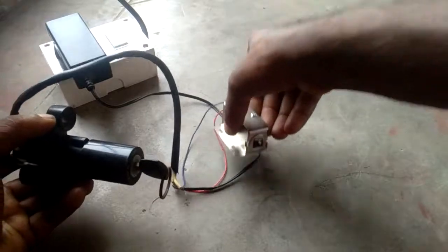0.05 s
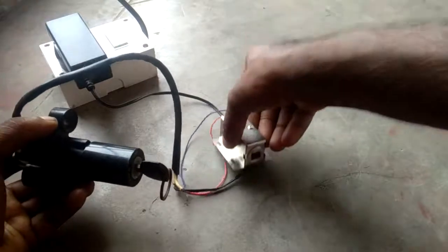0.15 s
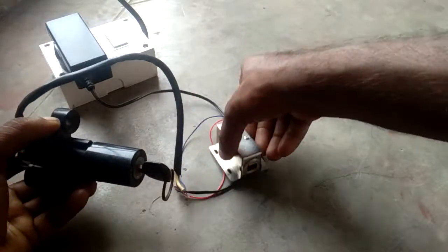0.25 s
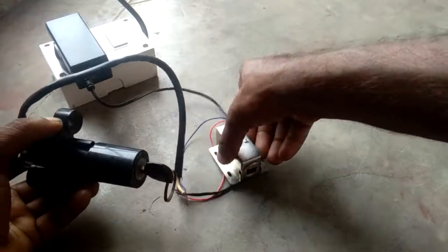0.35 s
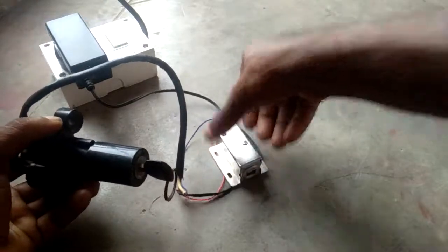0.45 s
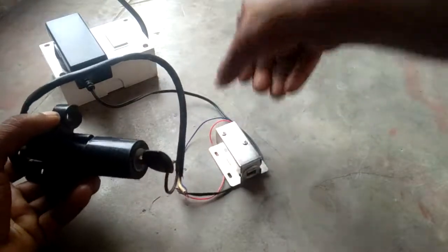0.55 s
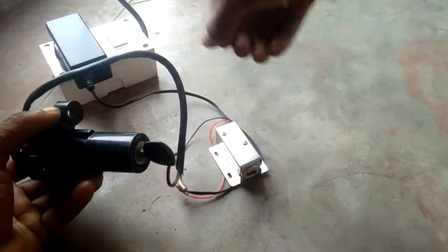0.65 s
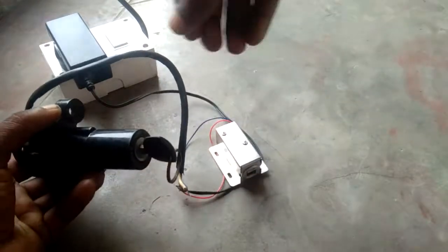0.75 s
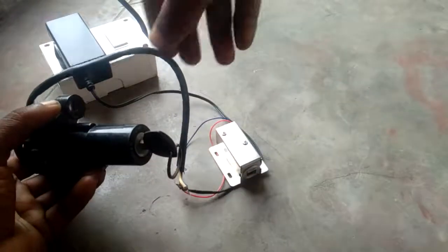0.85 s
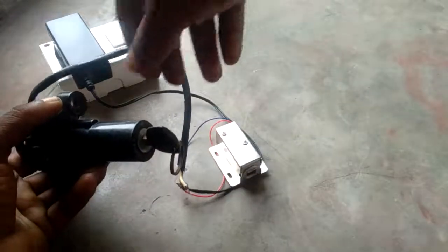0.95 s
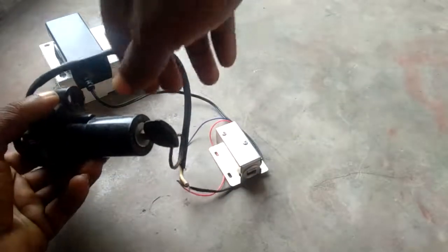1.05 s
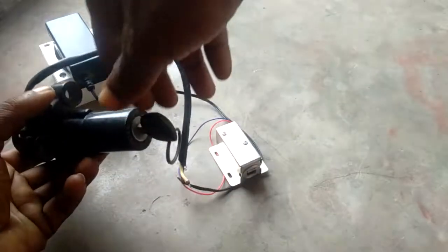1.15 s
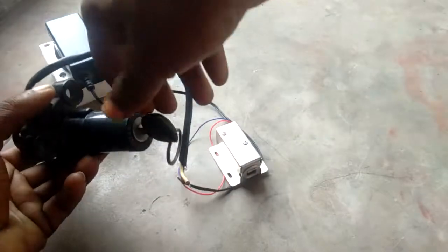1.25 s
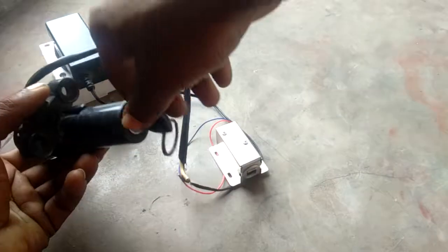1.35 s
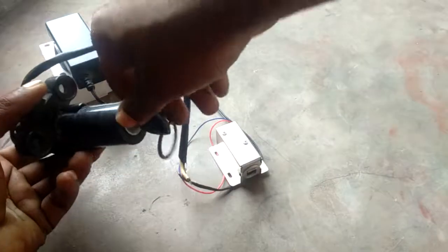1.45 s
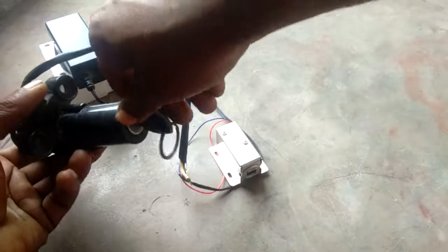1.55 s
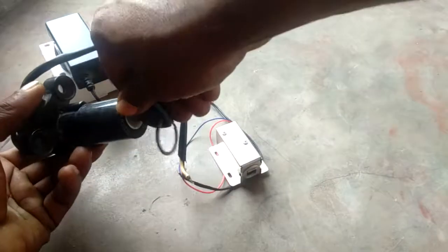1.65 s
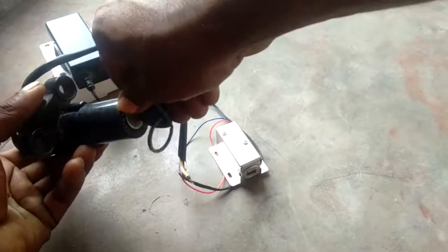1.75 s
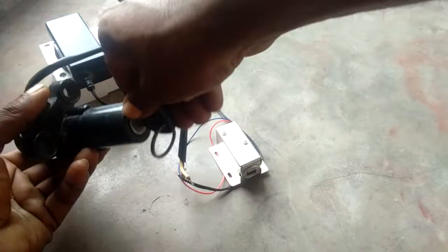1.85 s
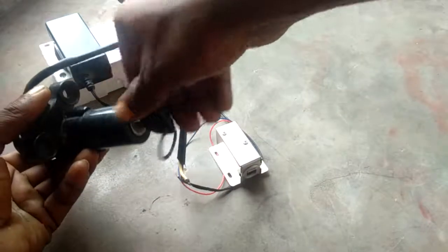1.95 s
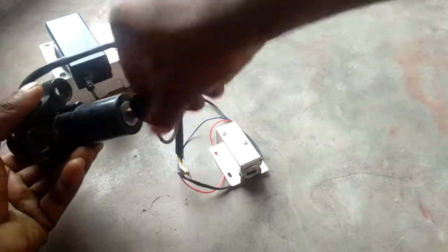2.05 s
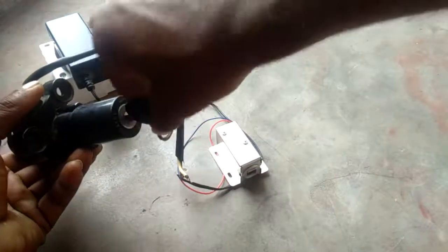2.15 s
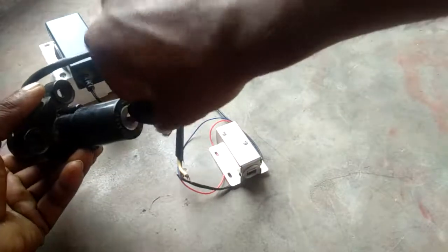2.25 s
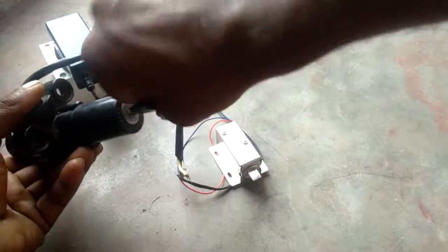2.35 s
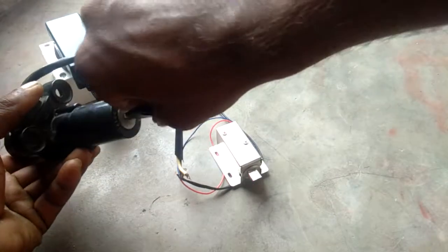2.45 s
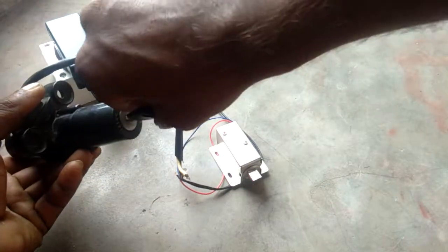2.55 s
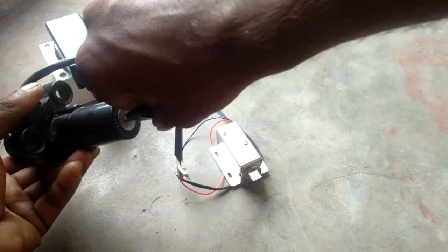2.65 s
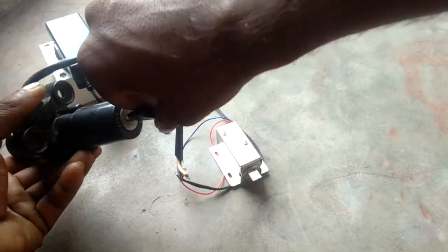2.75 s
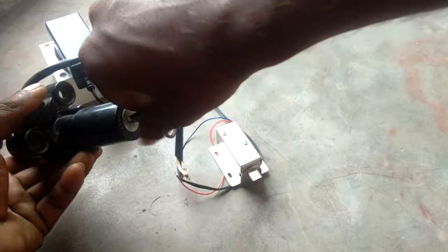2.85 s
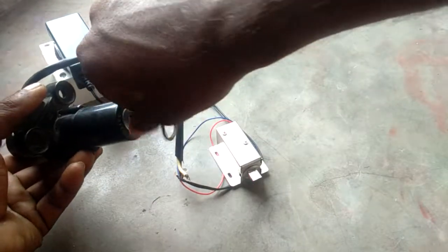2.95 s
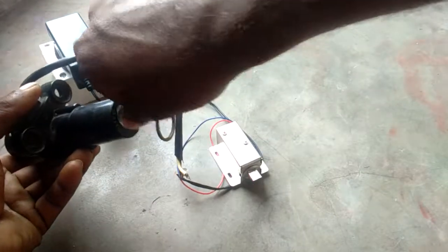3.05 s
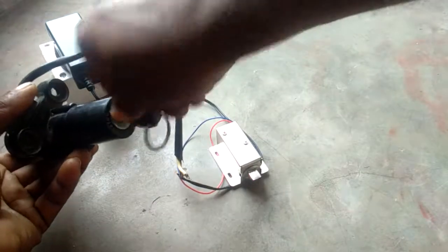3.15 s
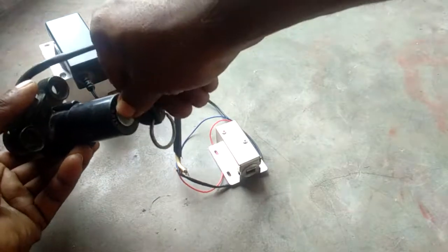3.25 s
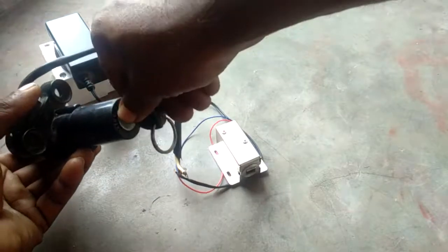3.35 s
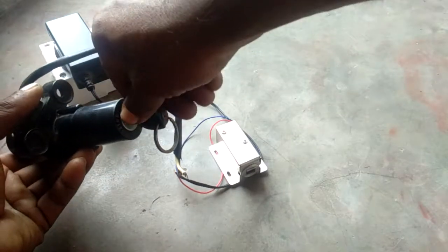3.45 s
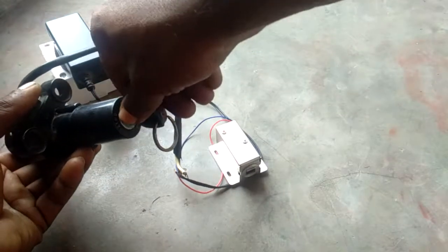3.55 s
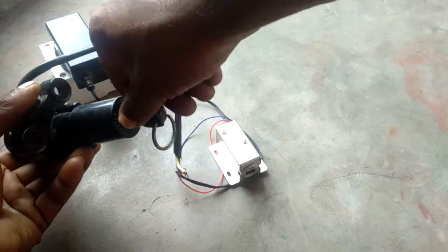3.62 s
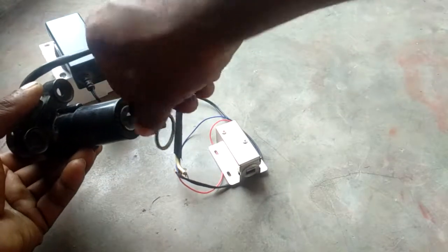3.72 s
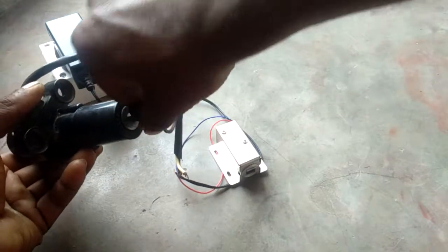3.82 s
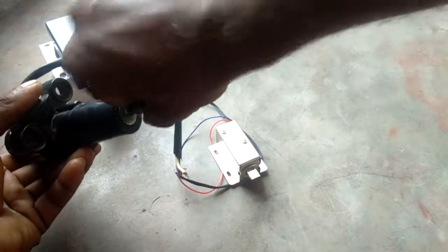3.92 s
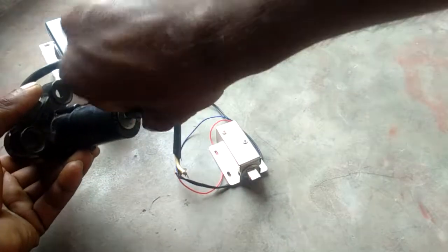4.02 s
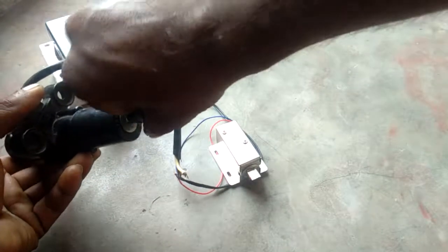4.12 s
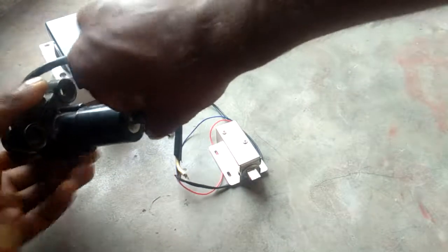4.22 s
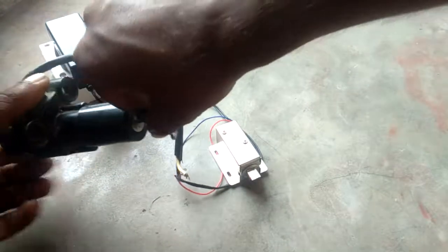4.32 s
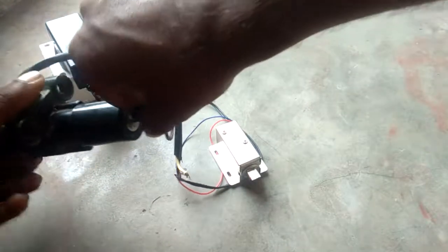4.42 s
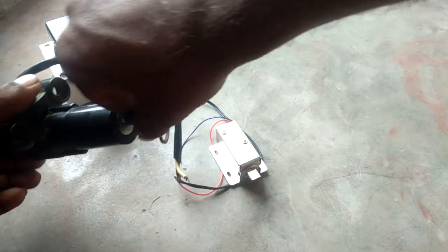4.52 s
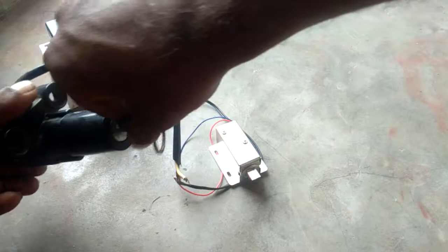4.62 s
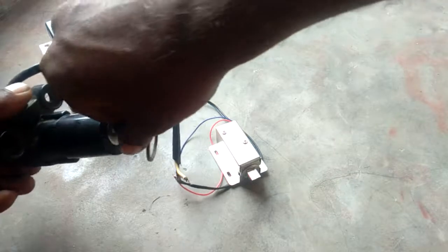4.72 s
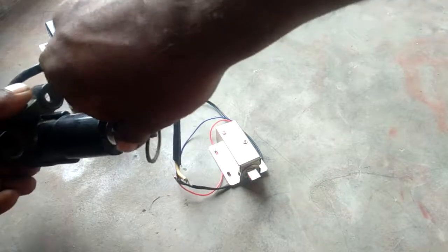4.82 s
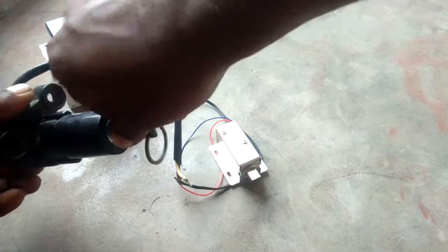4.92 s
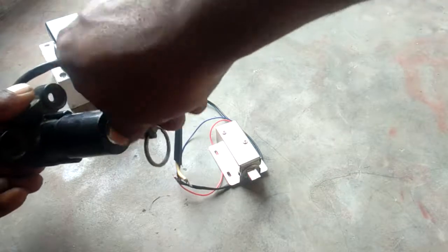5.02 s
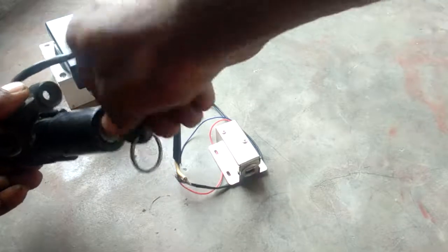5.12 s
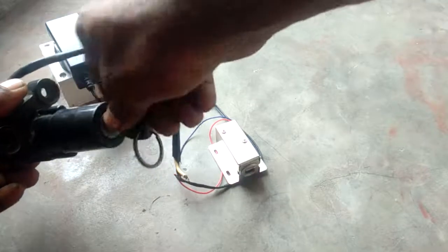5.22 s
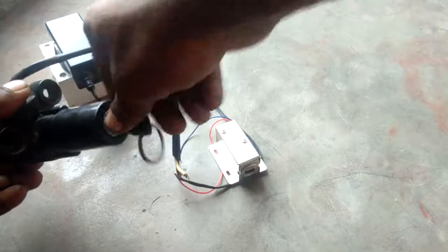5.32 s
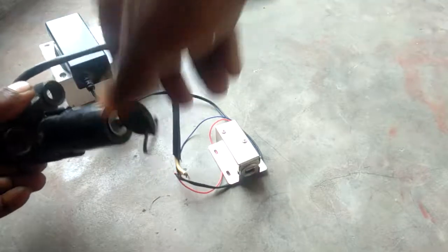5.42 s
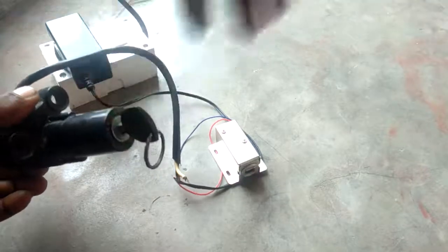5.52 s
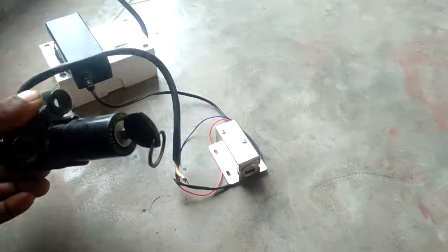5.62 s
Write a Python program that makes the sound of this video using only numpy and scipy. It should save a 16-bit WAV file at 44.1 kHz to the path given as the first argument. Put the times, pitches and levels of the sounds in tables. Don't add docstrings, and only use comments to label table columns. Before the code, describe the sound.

A small metal lock rattles onto concrete, then a key switch ticks and its bolt snaps out and in four times in a bare room.

```python
import sys
import numpy as np
from scipy import signal
from scipy.fft import rfft, irfft, next_fast_len
from scipy.io import wavfile
from scipy.ndimage import uniform_filter1d, map_coordinates

SR = 44100
rng = np.random.default_rng(int(sys.argv[2]) if len(sys.argv) > 2 else 0)


def materialize(psi):
    bounded = np.clip(np.atleast_2d(psi).T, -1, 1)
    quanta = np.round(bounded * 32767).astype(np.int16)
    wavfile.write(sys.argv[1], SR, quanta)


def attenuation_scalar(level_db):
    decades = np.asarray(level_db, float) / 20
    return 10 ** decades


N = 250488

# (time [s], strength [dB], rebound [dB], extra hardness [dB/octave], key tick [dB])
STROKE_EVENTS = [
    (2.4985, 0.1, -1, 0, 2.2),
    (3.3233, -0.84, -16, -0.8, -2),
    (4.0607, -0.5, 5, 2.7, 3),
    (5.2567, -0.8, 1, 0.5, 1.5),
]
# (delay [s], ring [dB], chatter [dB], chatter length [s], hardness [dB/octave])
SPRING_OUT_CONTACTS = [
    (0, -21.5, -14.5, 0.0019, 6.5),
    (.0022, -11, -30, 0.001, -2),
    (.0062, -46, -19, 0.019, 8.5),
    (.0168, -23.5, -20, 0.007, -2),
]
PULL_IN_CONTACTS = [
    (0, -20, 5.5, 0.0027, 4.5),
    (.003, -11.5, -1.5, 0.0065, 6),
    (.007, -50.5, -11, .005, 8.5),
    (0.015, -27.5, -14.5, 0.013, -4),
]
LOWER_HZ = [1700, 2290, 2420, 2785, 3340, 3415, 3505, 4310, 4460, 5150, 5580, 5890, 6440]
# (t60 [s], level springing out [dB],
# level pulled in [dB])
LOCK_MODES = [(0.02, -19, -42), (0.026, -35, -18.5), (0.0323, 1, -5.5), (0.021, -5, -15.5),
              (0.13, -10, -9.5), (.07, -8.5, -9), (0.09, -30, -10.5), (0.022, -7, -8), (0.032, -21, -6.5),
              (0.0055, -19, -20), (0.029, -15, -4.5), (.005, -6, -2.5), (0.0054, -23, -6.5),
              (0.019, -18, -11), (0.0071, -22, -9.5), (0.0065, -15, -17), (0.0051, -8, -11.5),
               (.022, -16, -17.5), (0.0056, -39, -27.5), (0.023, -21, -20.5), (0.022, -16, -17),
               (.012, -12.5, -19), (.012, -27, -19.5), (.01, -18.5, -23.5), (.018, -39, -26),
               (.018, -26, -28.5)]
UPPER_HZ = [6850, 7250, 7900, 8550, 8870, 9600, 10950, 11610, 12200, 12650, 13650, 14540, 15250]
# (lead [s], ring [dB], chatter [dB], chatter length [s], hardness [dB/octave])
KEY_OFF_CONTACTS = [(.021, -73, -36, 0.0033, 1.5), (.0175, -37, -17.5, .0045, -3),
                    (.0143, -48, -34.5, 0.0044, -2.5)]
KEY_ON_CONTACTS = [(.0275, -39.5, -23, 0.0046, -4), (0.027, -39, -19, 0.012, -2.5)]
# (frequency [Hz], t60 [s], level [dB])
BARREL_MODES = [(900, .004, -4), (1775, 0.011, -4.5), (2460, 0.025, -4.5), (3240, 0.0077, -8.5),
                (5270, 0.0043, 0.5), (5550, 0.0058, 2.5), (6690, 0.016, -1), (8040, 0.0044, -10),
                (9480, 0.0044, -15), (12300, .006, -7.5), (14700, .005, -12.5)]
# (time [s], ring [dB], hardness [dB/octave])
SETTLE_EVENTS = [(0.3042, -42, -4), (0.344, -47, -9), (.358, -43, -8), (.372, -33, 1.5),
                 (0.3818, -40.5, -2), (.388, -38.5, -2), (0.393, -45, -1.5), (.521, -58, -7),
                 (0.5754, -46, -4)]
# (frequency [Hz], t60 [s], level [dB])
FLANGE_MODES = [(1880, 0.0056, -7), (2750, 0.0087, -6.5), (3230, 0.0081, -3.5), (3370, 0.033, -10),
                (4770, 0.0079, -12.5), (5650, 0.0098, -12), (6300, 0.022, -11), (7500, 0.0033, -8),
                (8650, 0.008, -9), (10400, .02, -11), (11200, 0.021, -8), (11340, 0.017, -6.5),
                (11900, 0.015, -3), (12800, .015, -18), (13300, 0.02, -6), (15000, .01, -10)]
# (frequency [Hz], t60 [s])
ROOM_T60 = [(1000, 0.34), (2500, 0.49), (5000, 0.48), (8000, 0.49), (11000, 0.31), (16000, 0.31)]
# (frequency [Hz], density [dB/Hz])
AIR_SPECTRUM = [(140, -17.5), (230, -4.5), (274, 0), (333, -2), (465, -4), (554, -3), (722, -12.5),
                (816, -6.5), (1240, -7), (2000, -16), (2700, -19.5), (3910, -30), (6390, -33), (8770, -49),
                (15400, -60)]
# (time [s], level [dB])
AIR_LEVEL = [(0.0, -43), (0.76, -42), (1.01, -43.5), (3.23, -43.5), (3.67, -43.5), (5.68, -44)]
# (frequency [Hz], density [dB/Hz])
RUMBLE_SPECTRUM = [(12, -25.5), (38, -7), (48, -1.5), (70, 3), (150, 0.5), (230, -12), (300, -48)]
# (frequency [Hz], width [Hz], level [dB], steady share [0-1])
HUM_DRONES = [(70.6, 12, -58.5, 0.9), (101, 10.2, -42.5, 0.03), (115.6, 45, -54.5, 1),
              (202.7, 15, -47, 0.02), (613, 100, -53, 0.06)]
# (time [s], frequency [Hz], level [dB])
SQUEAL = [
    (1.17, 1850, -70),
    (1.27, 1860, -51),
    (1.44, 1815, -52),
    (1.52, 1800, -75),
]


def unit(x):
    return x / np.sqrt(np.mean(x ** 2) + 1e-20)


def along(points, hz):
    point_hz, value = np.transpose(points)
    return np.interp(np.log(hz + 1), np.log(point_hz + 1), value)


def curves(rows):
    knot_s, *columns = np.transpose(rows)
    return [np.interp(np.arange(N) / SR, knot_s, column) for column in columns]


def noise(gain):
    m = next_fast_len(N)
    spectrum = rfft(rng.standard_normal(m)) * gain(np.fft.rfftfreq(m, 1 / SR))
    return unit(irfft(spectrum, m)[:N])


def wobble(rate_hz):
    knots = rng.standard_normal(int(N * rate_hz / SR) + 4)
    return map_coordinates(knots, [np.arange(N) * rate_hz / SR])


def strikes(contacts, modes, scatter_db):
    out = np.zeros(N + SR)
    t = np.arange(SR // 5) / SR
    hz, t60_s, mode_db = np.transpose(modes)[:, :, None]
    octaves = np.log2(hz / 4000)
    wave = np.sin(2 * np.pi * hz * t)
    swell = 1 - np.exp(-t * hz / 0.7)
    phase = (-1.) ** np.arange(len(hz))[:, None]
    pressed_t60_s = np.minimum(t60_s, 0.0031 * np.maximum(1, 5500 / hz) ** 2.34)
    chatter_tilt_db = 2.96 * np.log2(hz / 5500) * (1 + (hz < 5500)) / 2
    for start_s, ring_db, chatter_db, length_s, hard_db in contacts:
        level_db = mode_db + hard_db * octaves + scatter_db * rng.standard_normal(hz.shape)

        free_db = ring_db + level_db - 1.1 * octaves - 60 * t / t60_s
        hit = np.sum(attenuation_scalar(free_db) * swell * wave, axis=0)

        damped_db = chatter_db + level_db + chatter_tilt_db - 60 * t / pressed_t60_s
        damped = np.sum(attenuation_scalar(damped_db) * phase * wave, axis=0)[:SR // 30]

        force = rng.standard_normal(SR // 20)
        force *= np.abs(force)
        force *= np.exp(-(t[:SR // 20] / length_s) ** 2)
        chatter = signal.fftconvolve(force / np.linalg.norm(force), damped)
        hit[:len(chatter)] += chatter
        out[round(start_s * SR):][:len(hit)] += hit
    return signal.sosfilt(signal.butter(2, 800, "high", fs=SR, output="sos"), out[:N])


def room(x, start_s):
    hz, t, z = signal.stft(rng.standard_normal(SR * 3 // 4), SR, nperseg=256)
    decay = attenuation_scalar(-60 * t / along(ROOM_T60, hz)[:, None])
    tail = signal.istft(z * decay, SR, nperseg=256)[1]
    tail *= 1 - np.exp(-(np.arange(len(tail)) / SR / 0.0013) ** 2)
    first = round(start_s * SR)
    wet = signal.fftconvolve(x[first:first + SR // 2], tail / np.linalg.norm(tail))
    return np.pad(wet, (first, N))[:N]


def bolt():
    modes = np.column_stack([LOWER_HZ + UPPER_HZ, LOCK_MODES])
    out = np.zeros(N)
    for k, (start_s, db, rebound_db, hard_db, _) in enumerate(STROKE_EVENTS):
        pulled_in = k % 2
        contacts = (SPRING_OUT_CONTACTS, PULL_IN_CONTACTS)[pulled_in]
        contacts = np.add(contacts, [start_s, db, db, 0, hard_db])
        contacts[-1, 1:3] += rebound_db
        stroke = strikes(contacts, modes[:, [0, 1, 2 + pulled_in]], scatter_db=0.1)
        out += stroke + attenuation_scalar(-6.0) * room(stroke, start_s)
    return out


def key_switch():
    contacts = []
    for k, (start_s, *_, tick_db) in enumerate(STROKE_EVENTS):
        for lead_s, ring_db, chatter_db, length_s, hard_db in (KEY_OFF_CONTACTS, KEY_ON_CONTACTS)[k % 2]:
            contacts.append((start_s - lead_s, ring_db + tick_db, chatter_db + tick_db, length_s, hard_db))
    ticks = strikes(contacts, BARREL_MODES, scatter_db=2.5)
    return ticks + attenuation_scalar(-1.5) * sum(room(ticks, start_s - 0.1) for start_s, *_ in STROKE_EVENTS)


def settling():
    chatter_over_ring_db, chatter_s = 8, 0.0068
    contacts = [(start_s, db, db + chatter_over_ring_db, chatter_s, hard_db)
                for start_s, db, hard_db in SETTLE_EVENTS]
    rattle = strikes(contacts, FLANGE_MODES, scatter_db=4.5)
    return rattle + attenuation_scalar(-10) * room(rattle, SETTLE_EVENTS[0][0] - 0.01)


def room_air():
    z = signal.stft(noise(lambda hz: attenuation_scalar(along(AIR_SPECTRUM, hz))), nperseg=512)[2]
    field = uniform_filter1d(rng.standard_normal(z.shape), 5, 0)
    field = uniform_filter1d(field, 12, 1)
    air = signal.istft(z * attenuation_scalar(0.78 * unit(field)), nperseg=512)[1][:N]
    level_db = curves(AIR_LEVEL)[0] + 1.0 + 0.6 * wobble(2.147)
    return attenuation_scalar(level_db) * unit(air)


def rumble():
    return attenuation_scalar(-43 + 0.68 * wobble(4.02)) * noise(lambda hz: attenuation_scalar(along(RUMBLE_SPECTRUM, hz)))


def mains_hum():
    out = np.zeros(N)
    for centre_hz, width_hz, db, steady in HUM_DRONES:
        phase = 2 * np.pi * centre_hz * np.arange(N) / SR + 0.48 * wobble(3.09)
        tone = np.sqrt(2) * np.sin(phase)
        fuzz = noise(lambda hz: np.exp(-((hz - centre_hz) / width_hz) ** 2))
        out += attenuation_scalar(db) * (np.sqrt(steady) * tone + np.sqrt(1 - steady) * fuzz)
    return out


def far_squeal():
    hz, db = curves(SQUEAL)
    level = attenuation_scalar(db + 1.5 * wobble(60.))
    return level * np.sin(2 * np.pi * np.cumsum(hz + 45 * wobble(90.)) / SR)


def background():
    return room_air() + rumble() + mains_hum() + far_squeal()


def scene():
    return (bolt() + key_switch() + settling() + background())[None]


def top_cut(x):
    return signal.sosfilt(signal.butter(12, 16810, fs=SR, output="sos"), x)


def record(dry):
    held = dry / (1 + np.abs(dry / 0.8) ** 6) ** (1 / 6)
    band = signal.sosfilt(signal.cheby1(12, 0.5, 15450, fs=SR, output="sos"), held)
    return top_cut(band)


dry = scene()
out = record(dry)
materialize(out)
```